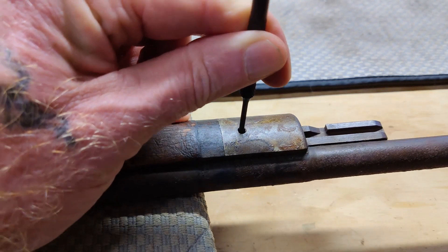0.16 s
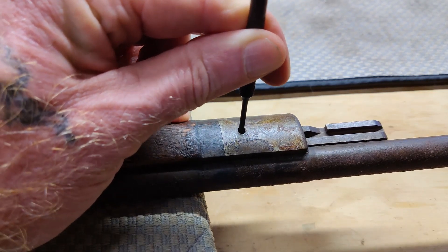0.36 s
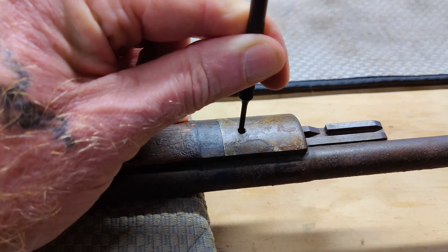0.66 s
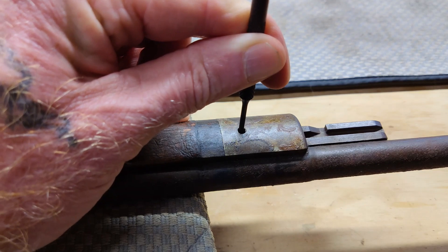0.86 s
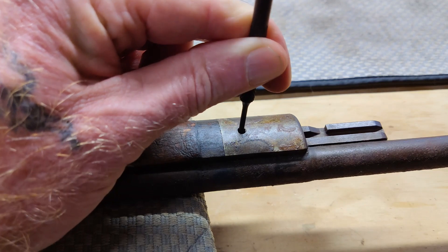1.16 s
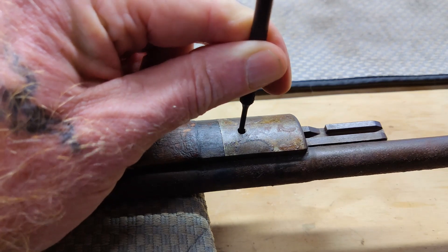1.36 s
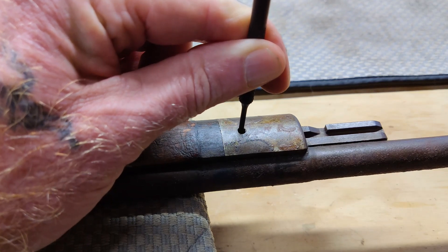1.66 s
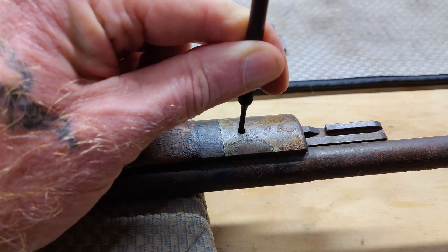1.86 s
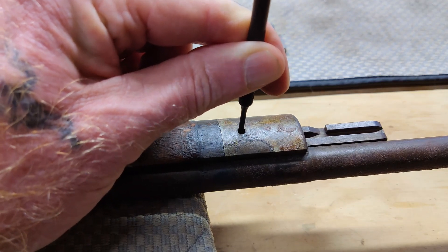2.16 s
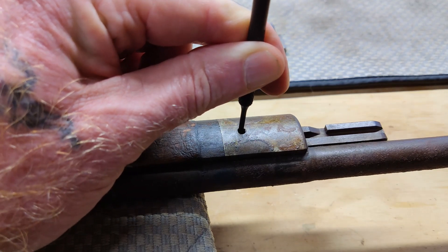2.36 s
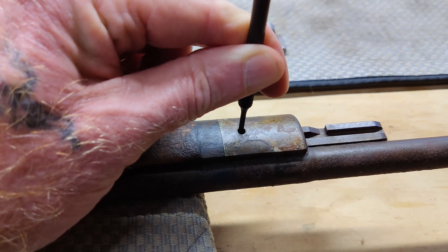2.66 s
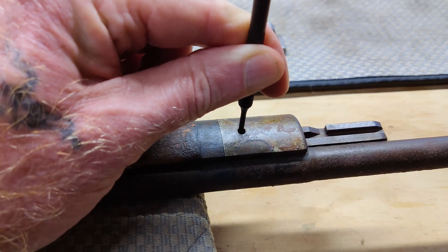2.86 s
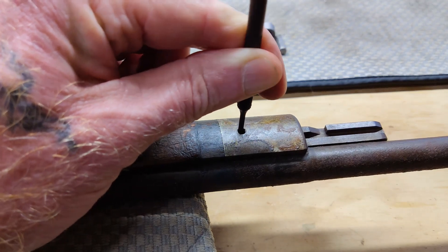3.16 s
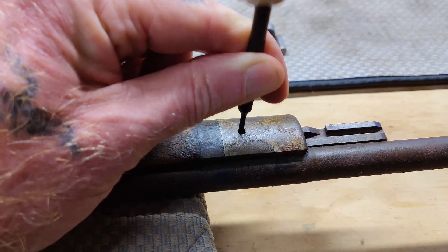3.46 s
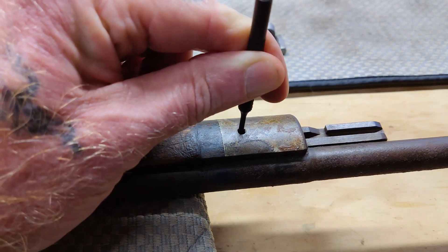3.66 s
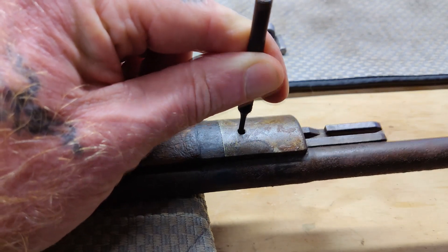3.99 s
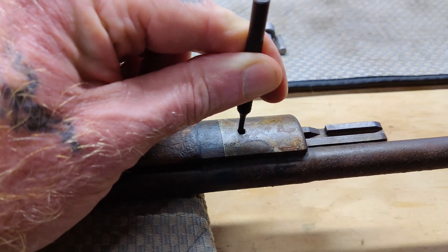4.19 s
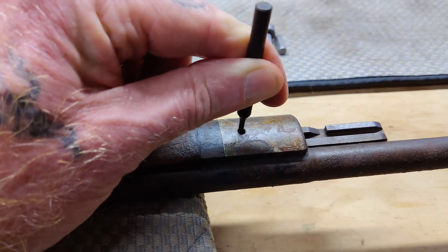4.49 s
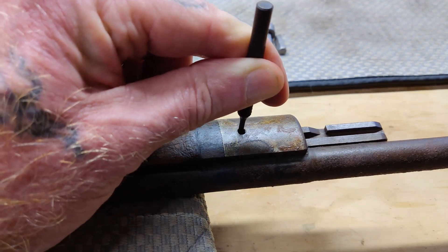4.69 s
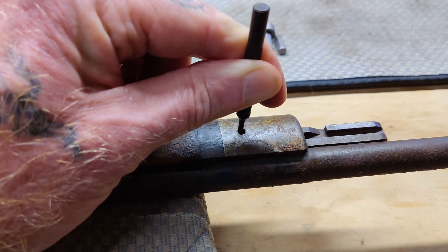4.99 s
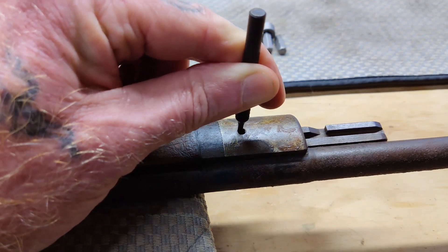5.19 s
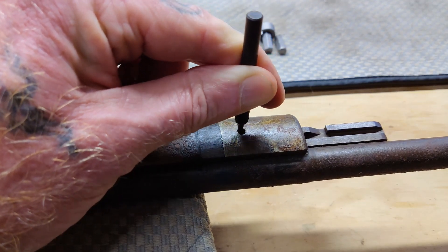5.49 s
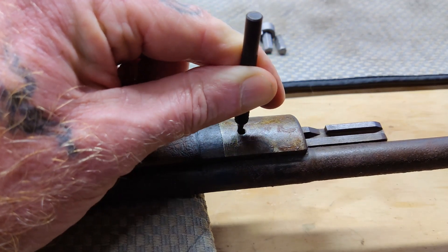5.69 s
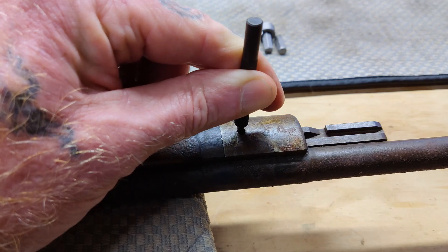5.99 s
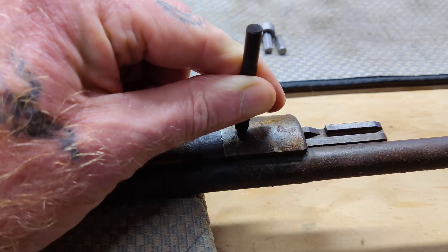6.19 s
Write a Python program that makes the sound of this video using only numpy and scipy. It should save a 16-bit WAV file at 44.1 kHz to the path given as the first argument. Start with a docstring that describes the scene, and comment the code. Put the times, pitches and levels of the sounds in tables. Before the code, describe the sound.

Close, hard steel-on-steel taps at over two per second, the wood thudding more heavily near the end, with a faint hum behind.

```python
"""First a faint rush of workshop air and a wavering hum, both made from bands of noise.
Then a hammer taps a steel pin punch on a rifle lying on a wooden workbench: seventeen fairly steady blows.
Each is a sharp crack with ringing steel, a knock of bench and stock (decaying sines), and a short noisy room ring.
The pin sticks at first; as it gives, the steel rings less and the wood knocks harder. One soft scrape falls between.
Two microphone ports colour left and right differently; gain control and a limiter hold each blow down."""
import sys
import numpy as np
from scipy import signal
from scipy.fft import irfft
from scipy.io import wavfile
from scipy.ndimage import uniform_filter1d, minimum_filter1d

SR = 44100
rng = np.random.default_rng(int(sys.argv[2]) if len(sys.argv) > 2 else 0)


def store_wav(level_fs):
    """Save 16-bit WAV to argv[1]."""
    pcm = np.round(np.clip(np.atleast_2d(level_fs), -1, 1) * 32767)
    wavfile.write(sys.argv[1], SR, pcm.T.astype(np.int16))


N = 279594  # length in samples

# steady workshop air and hiss: [f/Hz, level/dB per third octave]
AIR_LEVELS = [(25, -80), (40, -69.5), (55, -61), (95, -71.5), (200, -62.5), (270, -61), (335, -66),
              (450, -57), (800, -69), (1500, -68.5), (3000, -74.5), (4300, -80), (6000, -78.5),
              (13000, -76.5)]
# how alike left and right are: [f/Hz, likeness from 0 to 1]
STEREO_LIKENESS = [(50, 0.81), (250, 0.68), (600, 0.067), (1500, 0.044), (4000, 0.029)]
# faint wavering hum: [f/Hz, width/Hz, level/dB]
HUM_TONES = [(305.2, 5.8, -59), (359.7, 9.2, -58.5), (760, 8.3, -72), (963, 13, -75)]
# hammer blows: [t/s, force/dB against a usual blow, give of the pin from 0 to 1]
BLOWS = [(0.1973, 1, 0.2), (0.6139, -1.5, 0.12), (1.0401, 0.5, 0.22), (1.4207, 0, 0), (1.7807, 0.6, 0.26),
         (2.1416, -0.3, 0.36), (2.5297, -0.9, 0.05), (2.969, 0.4, 0.1), (3.4651, 0, 0.12), (3.8003, 0, 0),
         (4.0741, -1, 0.22), (4.4148, 0.6, 0.28), (4.8035, -0.5, 0.42), (5.1259, 0.5, 0.77), (5.4426, 0, 1),
         (5.8286, -1, 0.51), (6.1636, 1.5, 0.41)]
# hammer, punch and barrel, damped by the hand: [f/Hz, relative level/dB, 60 dB fade time/s]
STEEL_MODES = [(1765, -20, 0.028), (2140, -16.5, 0.026), (3903, -10, 0.01), (4127, -21, 0.032),
               (4190, -11, 0.016), (4700, -16.5, 0.018), (4440, -40, 0.15), (6464, -14, 0.014),
               (7150, -24.5, 0.024), (7500, -15.5, 0.015), (9000, -25.5, 0.0067), (11720, -25.5, 0.0097),
               (12200, -25, 0.017)]
# bench top with the rifle on it: [f/Hz, relative level/dB, 60 dB fade time/s]
BENCH_MODES = [(54.3, -30.5, 0.41), (76.3, -39, 0.17), (116.5, -43.5, 0.71), (169.2, -39.5, 0.51),
               (211.7, -33.5, 0.38), (244.5, -36.5, 0.37), (318.5, -27.5, 0.2), (342.1, -30.5, 0.2),
               (400, -39.5, 0.34), (446, -42.5, 0.15), (528, -42.5, 0.17), (626, -54.5, 0.23),
               (721, -43, 0.29), (952, -46, 0.18)]
# wooden stock jolted against its rest: [f/Hz, relative level/dB, 60 dB fade time/s]
STOCK_MODES = [(142, -31, 0.08), (179, -31, 0.087), (310, -37.5, 0.056), (537, -42, 0.0045),
               (680, -46.5, 0.024), (1274, -37, 0.05), (1580, -39.5, 0.05)]
# dense ring of wood and workshop: [f/Hz, relative level/dB per third octave, 60 dB fade time/s]
WORKSHOP_RING = [(40.5, -45.5, 0.51), (160, -37.5, 0.32), (284, -30.5, 0.23), (505, -36, 0.19),
                 (1150, -41.5, 0.16), (2080, -37.5, 0.14), (3150, -38, 0.15), (4500, -36, 0.15),
                 (6040, -37, .15), (8670, -45, 0.14), (13600, -47, 0.14)]
# first clatter of punch, pin and stock: [f/Hz, level/dB against the workshop ring]
CLATTER_LEVELS = [(100, 4), (500, -0.5), (1200, 7.5), (2500, 12.5), (4500, 21), (8000, 22.5), (14000, 19.5)]
# slow, low vibrations take longer to spread through the bench: [f/Hz, delay t/s]
SPREAD_DELAYS = [(200, .012), (700, 0.0049), (1500, 0.0014), (4000, 0.00033)]
# small contacts of the tools between blows: [t/s, relative level/dB]
TICKS = [(3.074, -58)]
# resonances of the two microphone ports: [f/Hz, width/Hz, level/dB]
LEFT_PORT = [(4370, 830, 14), (9450, 2400, -5.5), (10980, 850, 3)]
RIGHT_PORT = [(6700, 1120, 16), (2920, 1200, 1.5), (11360, 1800, -4.5)]

# How each part answers a blow:
# [level/dB at a usual blow on a stuck pin, dB per dB of force, dB added at full give]
STEEL_RULE = (-2, 1.4, -3.5)  # the steel rings less when the pin moves
BENCH_RULE = (-2, 1.3, 3.6)
STOCK_RULE = (5, 0.5, 6)
EDGE_RULE = (4, 2.9, 0.5)  # treble edge of the crack
JOLT_RULE = (-3.5, 0.3, 15.0)  # stock against its rest

# left minus right of the wood's ring: on a stuck pin, and its shift at full give
WOOD_PAN_DB, GIVE_PAN_DB = 5.5, -7
# once the punch is fully sunk, the wall of the hole damps the steel and brightens the contact this much
SUNK_DAMPING_DB_PER_S, SUNK_EDGE_DB = 197, 3.5
LIMITER_CEILING_DB = -0.4  # before the last treble cut
MICROPHONE_TOP_HZ, CUTOFF_HZ = 13000, 16900
SIDES = np.array([[0.5], [-0.5]])  # left and right shares of a pan in dB


def from_db(db):
    """Turn decibels into a plain multiplier."""
    return 10 ** (np.asarray(db) / 20)


def at_hz(table, hz, axis=1):
    """Read one column of a table, sliding between rows by pitch (log frequency)."""
    table = np.array(table)
    return np.interp(np.log(hz), np.log(table[:, 0]), table[:, axis])


def add(track, sound, s):
    """Mix a sound in, starting at s seconds."""
    start = int(round(s * SR))
    track[..., start:start + sound.shape[-1]] += sound[..., :N - start]


def noise_bands(size):
    """Third-octave centres and stereo noises of rms 1, most alike in the bass: bands x 2 x size."""
    centres = 25 * 2 ** (np.arange(29) / 3)
    white = rng.standard_normal((2, 2, size + SR // 4))  # the extra start lets the filters settle
    bands = []
    for k, hz in enumerate(centres):
        edges = [hz / 2 ** (1 / 6), hz * 2 ** (1 / 6)]
        sos = signal.butter(2, edges, "band", fs=SR, output="sos")
        mid, side = signal.sosfilt(sos, white[k % 2])[:, -size:]
        alike = at_hz(STEREO_LIKENESS, hz)
        shared = np.sqrt(1 + alike) * mid
        opposed = np.sqrt(1 - alike) * side * np.array([[1], [-1]])
        pair = shared + opposed
        bands.append(pair / pair.std())
    return centres, np.array(bands)


def air():
    """Low steady rush of the workshop: noise bands at fixed levels."""
    centres, bands = noise_bands(N)
    return np.einsum("b,bct->ct", from_db(at_hz(AIR_LEVELS, centres)), bands)


def hum():
    """Noise through narrow filters, heard as wavering tones."""
    out = np.zeros(N)
    for hz, width_hz, db in HUM_TONES:
        b, a = signal.iirpeak(hz, hz / width_hz, fs=SR)
        tone = signal.lfilter(b, a, rng.standard_normal(N + SR))[SR:]
        out += from_db(db) * tone / tone.std()
    return out


def response(rule, force_db, give):
    """Level of one part for a blow of this force that moves the pin this far."""
    usual_db, per_force, give_db = rule
    return usual_db + per_force * force_db + give_db * give


def dying(t, t60):
    """Smooth fade that drops 60 dB in t60 seconds."""
    return np.exp(-np.log(1000) * t / t60)


def ring_fades(t, centres, build_s=0.0057, clatter_t60=0.021):
    """Energy spreads through bench and room, builds up and dies; a brief clatter comes first."""
    ring_db = at_hz(WORKSHOP_RING, centres)[:, None]
    ring_t60 = at_hz(WORKSHOP_RING, centres, axis=2)[:, None]
    age = np.maximum(t - at_hz(SPREAD_DELAYS, centres)[:, None], 0)
    ring = from_db(ring_db) * dying(age, ring_t60) * (1 - np.exp(-age / build_s))
    clatter_db = ring_db + at_hz(CLATTER_LEVELS, centres)[:, None]
    return ring + from_db(clatter_db) * dying(t, clatter_t60)


def crack(t, level_db, sweep_s, low_hz, high_hz, rough, size=512):
    """One sharp contact drawn out by the steel: bending waves carry treble first, lower notes just after."""
    hz = np.fft.rfftfreq(size, 1 / SR) + 1
    delay = sweep_s * np.sqrt(1000 / np.maximum(hz, 1000))
    shape = hz / np.hypot(hz, low_hz) / (1 + (hz / high_hz) ** 2)
    # adding up the delays along frequency gives the phase
    phase = -2 * np.pi * np.cumsum(delay) * SR / size
    pulse = irfft(shape * np.exp(1j * phase))
    # the faces never meet quite flat, so they chatter for a moment
    chatter = rough * rng.standard_normal(size) * dying(t[:size], t60=0.006)
    chatter[0] = 1
    sound = np.convolve(pulse / np.abs(pulse).max(), chatter)
    return from_db(level_db) * np.pad(sound, (0, len(t)))[:len(t)]


def struck(modes, t, scatter_db, detune):
    """Dying sines rung by one blow; contact point and grip vary their strengths and pitches a little."""
    out = np.zeros(len(t))
    for k, (hz, db, t60) in enumerate(modes):
        strength, grip = rng.standard_normal(2)
        level = (-1) ** k * from_db(db + scatter_db * strength)
        out += level * dying(t, t60) * np.sin(2 * np.pi * hz * (1 + detune * grip) * t)
    return out


def steel_clink(t, steel_db, edge_db, depth, left_lag_s=0.000085):
    """Crack and ringing steel; the punch stands nearer to the right port, so left hears it later."""
    # a harder hit makes a shorter contact and a brighter crack
    high_hz = 12000 * from_db(edge_db / 2)
    clink = crack(t, level_db=2.0, sweep_s=0.0014155, low_hz=2380, high_hz=high_hz, rough=0.15)
    ring = struck(STEEL_MODES, t, scatter_db=3.5, detune=0.007)
    clink += from_db(steel_db / 2 - SUNK_DAMPING_DB_PER_S * depth * t) * ring
    return np.array([np.interp(t - left_lag_s, t, clink, left=0), clink])


def bench_thump(t, bench_db, pan_db):
    """The heavy bench top sounds its own low notes."""
    level = from_db(bench_db / 2 + 0.64 * pan_db * SIDES)
    return level * struck(BENCH_MODES, t, scatter_db=1.35, detune=0.005)


def stock_jolt(t, jolt_db, pan_db):
    """The rifle bottoms out on its rest and rings the stock, hardest when the pin gives."""
    level = from_db(jolt_db + 0.28 * pan_db * SIDES)
    return level * struck(STOCK_MODES, t, scatter_db=6.0, detune=0.027)


def hammering(repeat=0.62, bench_lag_s=0.01199, jolt_lag_s=0.0145, steel_pan_db=2.0):
    """Every blow rings steel, bench, stock and room; the echoes stay partly the same from blow to blow."""
    t, out = np.arange(int(0.7 * SR)) / SR, np.zeros((2, N))
    centres, same_echoes = noise_bands(len(t))
    _, fresh_echoes = noise_bands(N)
    fades = ring_fades(t, centres)
    times, forces_db, gives = np.transpose(BLOWS)
    # the punch follows the pin into its hole: 1 is fully sunk
    depths = np.cumsum(gives) / gives.sum()
    for s, force_db, give, depth in zip(times, forces_db, gives, depths):
        steel_db = response(STEEL_RULE, force_db, give)
        bench_db = response(BENCH_RULE, force_db, give)
        stock_db = response(STOCK_RULE, force_db, give)
        edge_db = response(EDGE_RULE, force_db, give) + SUNK_EDGE_DB * depth
        jolt_db = response(JOLT_RULE, force_db, give)
        pan_db = WOOD_PAN_DB + GIVE_PAN_DB * give

        start = rng.integers(N - len(t))
        fresh = fresh_echoes[..., start:start + len(t)]
        echoes = np.sqrt(repeat) * same_echoes + np.sqrt(1 - repeat) * fresh
        # each part colours its own range of the ring
        colour = [(300, bench_db), (700, stock_db), (1600, stock_db),
                  (3000, steel_db), (7000, steel_db), (10000, edge_db)]
        lean_db = at_hz([(900, pan_db), (2500, steel_pan_db)], centres)
        levels = from_db(at_hz(colour, centres) + SIDES * lean_db)
        add(out, np.einsum("cb,bt,bct->ct", levels, fades, echoes), s)

        add(out, steel_clink(t, steel_db, edge_db, depth), s)
        # the bench answers a moment later, through the padded rest
        add(out, bench_thump(t, bench_db, pan_db), s + bench_lag_s)
        add(out, stock_jolt(t, jolt_db, pan_db), s + jolt_lag_s)
    return out


def ticks(low_hz=7000, high_hz=12000, swell_s=0.011):
    """The punch resettles with a faint, soft scrape: treble noise that swells and fades."""
    t, out = np.arange(SR // 8) / SR, np.zeros(N)
    sos = signal.butter(2, [low_hz, high_hz], "band", fs=SR, output="sos")
    swell = t / swell_s * np.exp(1 - t / swell_s)
    for s, db in TICKS:
        scrape = signal.sosfilt(sos, rng.standard_normal(len(t)))
        add(out, from_db(db) * swell * scrape, s)
    return out


def scene():
    """Mix the steady background, the blows and the scrape."""
    return air() + hum() + hammering() + ticks()


def port(x, resonances):
    """The cavity in front of a microphone: a chain of peaks and dips."""
    for hz, width_hz, db in resonances:
        w = 2 * np.pi * hz / SR
        damping = np.sin(w) * width_hz / (2 * hz)
        top = damping * from_db(max(db, 0))
        bottom = damping * from_db(max(-db, 0))
        middle = -2 * np.cos(w)
        x = signal.lfilter([1 + top, middle, 1 - top], [1 + bottom, middle, 1 - bottom], x)
    return x


def gain_control(x, threshold_db, depth_db, hold_s, glide_s):
    """A loud peak turns both channels down by up to depth_db; the cut is held, then glides back."""
    peak_db = 20 * np.log10(np.abs(x).max(0) + 1e-9)
    over = np.clip(peak_db - threshold_db, 0, depth_db)
    half = int(hold_s * SR / 2)
    # the shifted window looks back only, so each cut lasts hold_s
    held = -minimum_filter1d(-over, 2 * half + 1, origin=half, mode="constant")
    # a running maximum on a rising ramp lets the cut shrink at a steady rate in dB
    ramp = depth_db / glide_s * np.arange(N) / SR
    return x * from_db(ramp - np.maximum.accumulate(held + ramp))


def limiter(x, release_db_per_s, size=45):
    """Each channel's peaks are seen a moment ahead and held under the ceiling; gain recovers quickly."""
    over = np.maximum(20 * np.log10(np.abs(x) + 1e-9) - LIMITER_CEILING_DB, 0)
    ramp = release_db_per_s * np.arange(N) / SR
    cut = np.maximum.accumulate(over + ramp, axis=1) - ramp
    return x * from_db(uniform_filter1d(minimum_filter1d(-cut, size), size))


def record(dry):
    """Ports colour the sound, the treble softens, gain control and limiter act, and the top is cut."""
    x = np.array([port(dry[0], LEFT_PORT), port(dry[1], RIGHT_PORT)])
    x = signal.sosfilt(signal.butter(2, MICROPHONE_TOP_HZ, fs=SR, output="sos"), x)
    x = gain_control(x, threshold_db=-24.0, depth_db=5.5, hold_s=0.05, glide_s=0.054)
    x = limiter(x, release_db_per_s=437.5)
    return signal.sosfilt(signal.cheby2(16, 80, CUTOFF_HZ, fs=SR, output="sos"), x)


dry = scene()
out = record(dry)
store_wav(out)
```